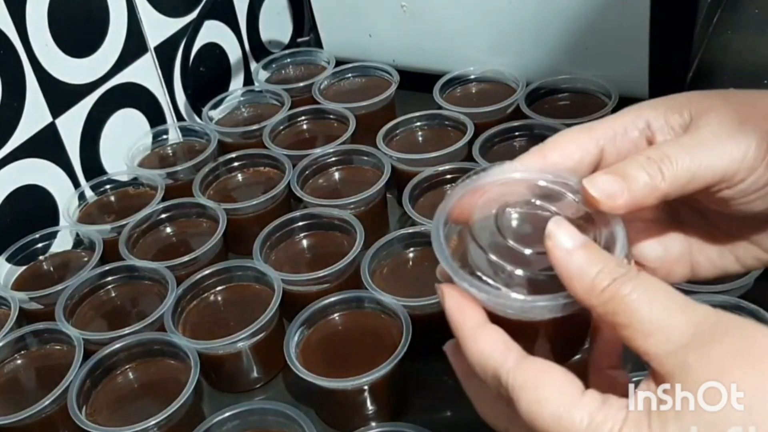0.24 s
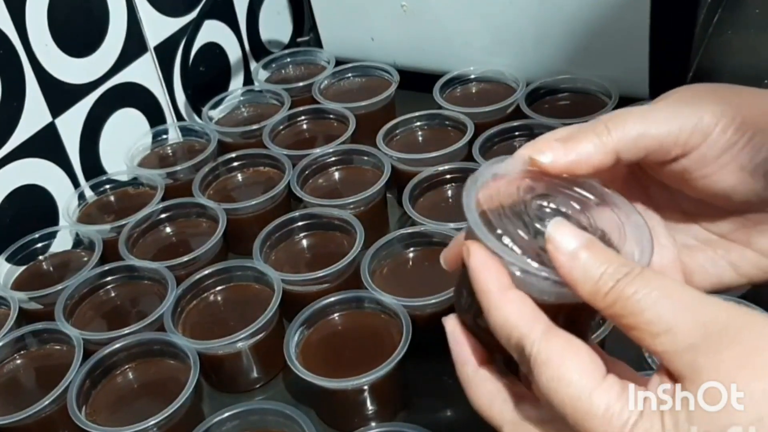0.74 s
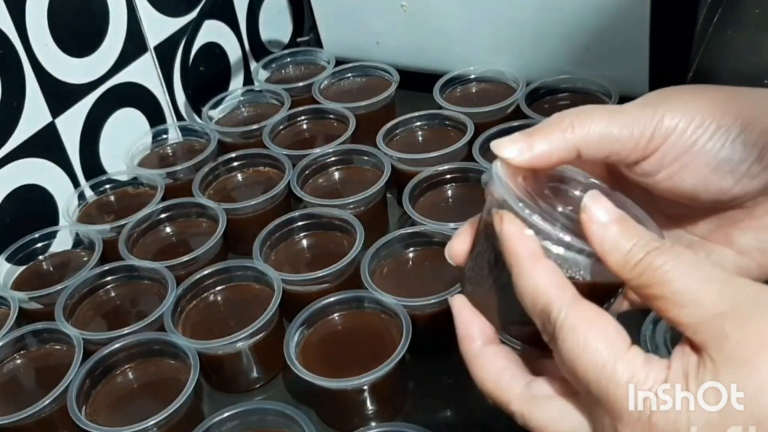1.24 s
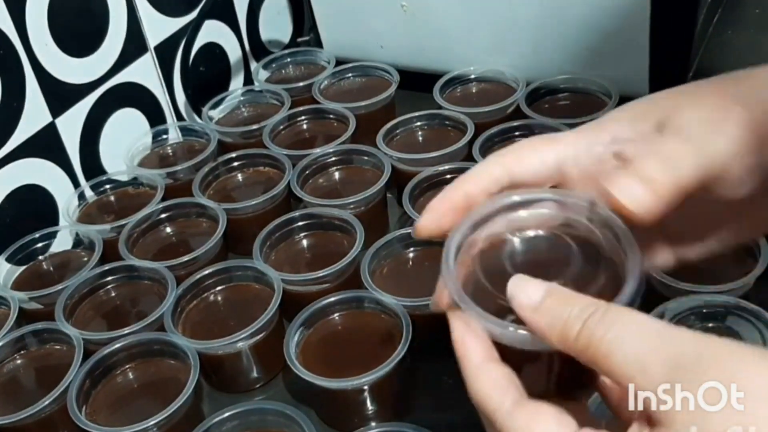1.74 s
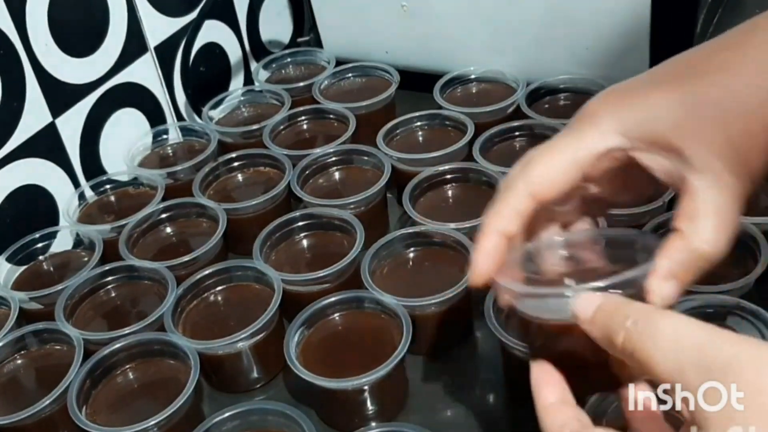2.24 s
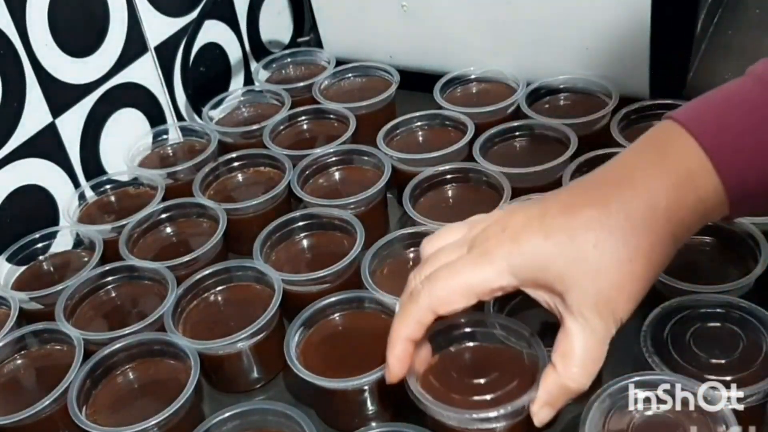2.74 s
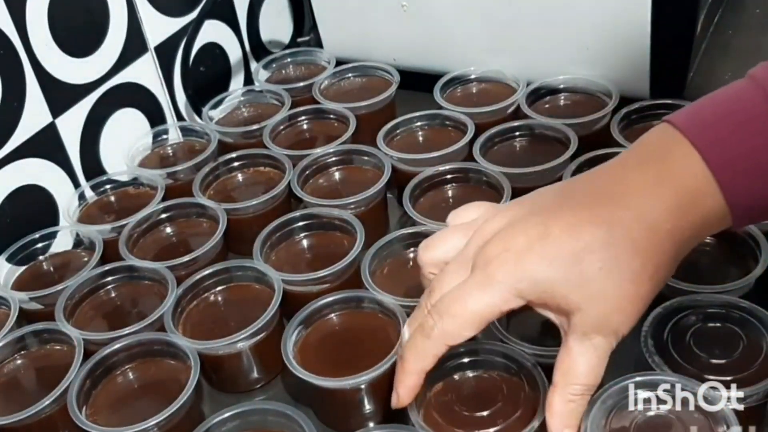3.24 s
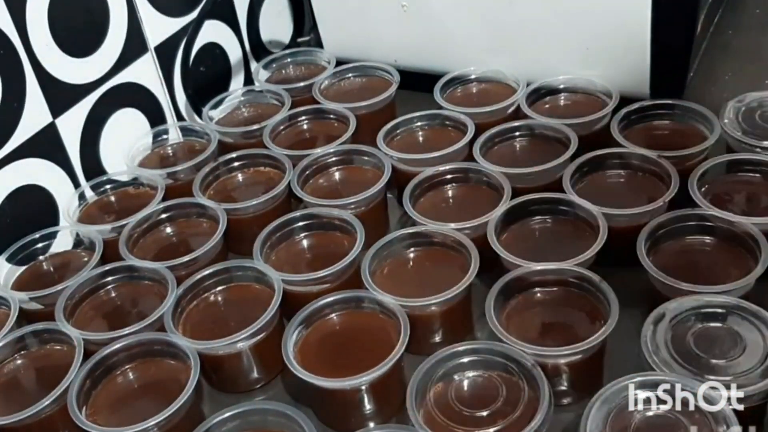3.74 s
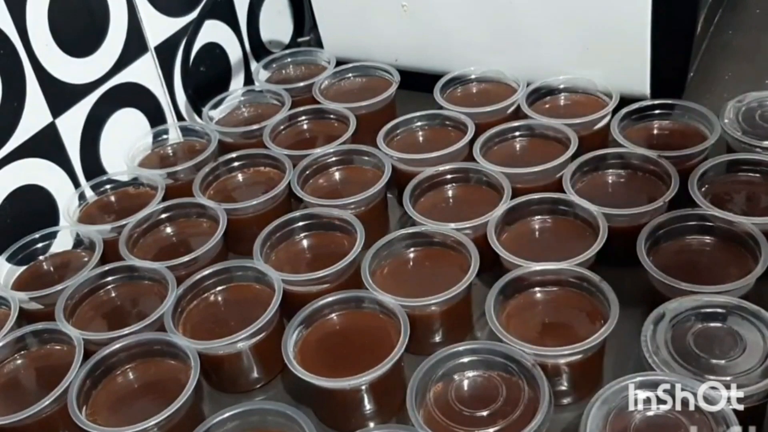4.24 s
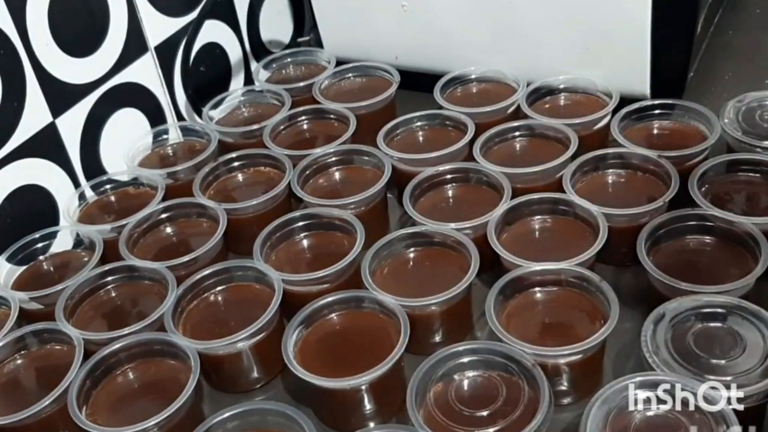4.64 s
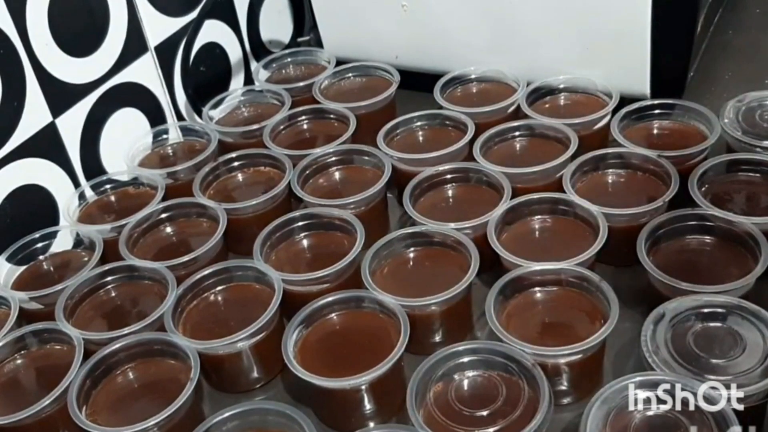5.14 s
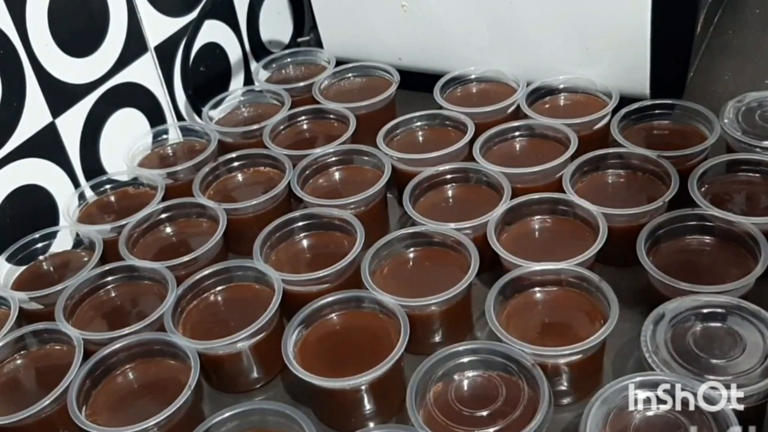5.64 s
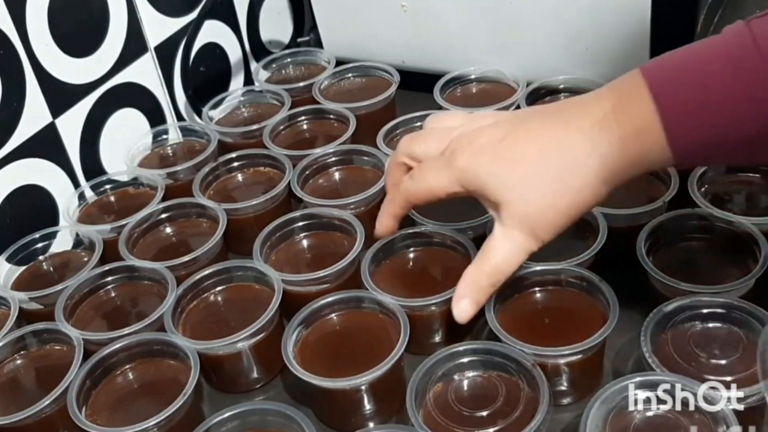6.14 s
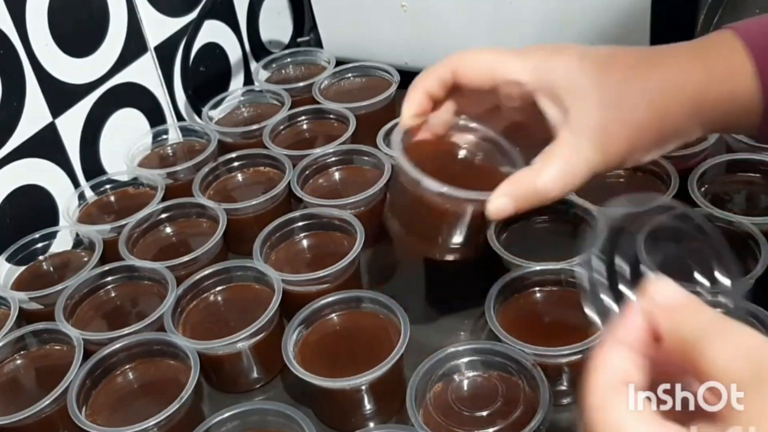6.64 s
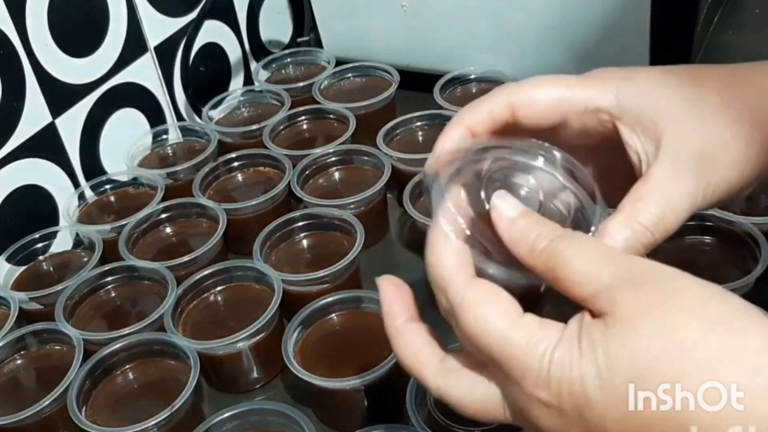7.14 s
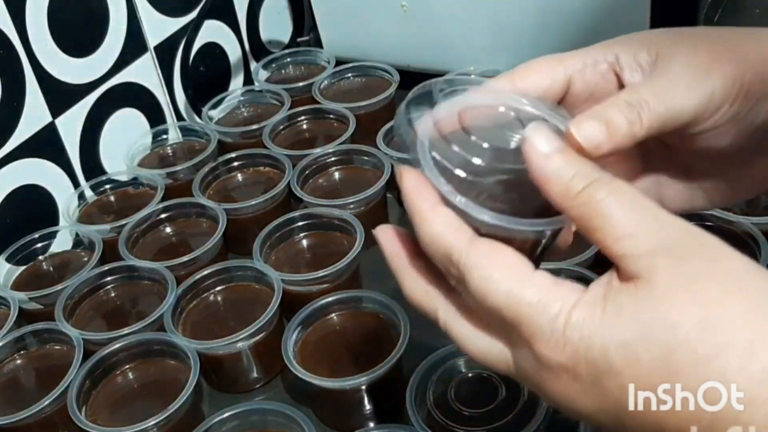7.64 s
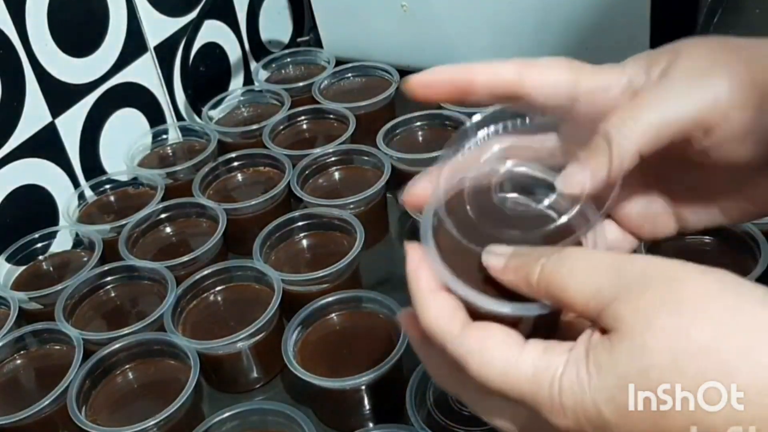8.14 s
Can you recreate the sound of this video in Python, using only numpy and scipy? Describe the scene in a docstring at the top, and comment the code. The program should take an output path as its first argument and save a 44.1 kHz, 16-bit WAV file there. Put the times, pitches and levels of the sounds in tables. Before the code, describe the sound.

Hands press light plastic lids onto filled plastic cups. Crisp, bright snaps arrive irregularly, each leaving a brief crackle and a short room echo. Between them come thin rustles, wall creaks, edge ticks, gritty scrapes and tiny faint squeaks. The strongest run of snaps, with dull table thuds, comes past the middle, then busy crinkling continues to the end. Close two-channel pickup, quiet hissy room.

```python
"""A sharp plastic snap comes almost at once, then others, as thin lids are pressed onto plastic cups.
Each snap is a noise burst of tiny buckles ringing modes of cup and lid; crackle dies away after it.
Between snaps, shaped noise and slips make rustle, creaks, ticks and scrapes; cups knock on the table.
Faint wavering tones come and go over room hiss and low rumble.
A close two-port microphone hears it all in a small hard room, with sparse decaying echoes of the hits."""
import sys
import numpy as np
from scipy import signal
from scipy.io import wavfile
from scipy.ndimage import uniform_filter1d

SR = 44100
rng = np.random.default_rng(int(sys.argv[2]) if len(sys.argv) > 2 else 0)


def log_audio(samples):
    """Write samples as a 16-bit WAV file to the path given in sys.argv[1]."""
    # one column per channel
    frames = np.atleast_2d(samples).T
    # limit to full scale, then quantise
    limited = np.clip(frames, -1, 1)
    pcm = np.round(limited * 32767).astype(np.int16)
    wavfile.write(sys.argv[1], SR, pcm)


N = 369558  # samples


def gain_of(db):
    """Amplitude factor of a level in dB."""
    return 10 ** (np.asarray(db) / 20)


def evened(x):
    """Scale to rms 1."""
    return x / np.sqrt(np.mean(x ** 2) + 1e-20)


def peaked(x):
    """Scale to peak 1."""
    return x / (np.max(abs(x)) + 1e-12)


def read(points, hz):
    """Interpolate a (frequency, value) table along log frequency."""
    f, value = np.transpose(points)
    return np.interp(np.log(hz + 1), np.log(f + 1), value)


def add(mix, time_s, sound):
    """Mix a two-port sound in at its time, cut at the end."""
    part = mix[:, round(time_s * SR):][:, :sound.shape[1]]
    part += sound[:, :part.shape[1]]


def ring(x, modes):
    """Each mode: shift its pitch curve to zero, smooth twice, shift back; neighbours swing in opposition."""
    out = 0
    for k, (hz, width_hz, db) in enumerate(modes):
        phase = 2 * np.pi * np.cumsum(hz * np.ones(x.shape[-1])) / SR
        turn = np.exp(1j * phase)
        r = np.exp(-np.pi * width_hz / SR)  # width of each of the two poles
        shifted = x * turn.conj() + 1e-18
        smooth = signal.lfilter([(1 - r) ** 2], [1, -2 * r, r * r], shifted)
        out = out + (-1) ** k * gain_of(db) * 2 * (turn * smooth).real
    return out


def slips(per_s, spread_db, fade_s):
    """Sparse slips of the skin on plastic, most small and a few large, each starting sharply and fading."""
    when, size = rng.random(N), rng.exponential(1, N)
    starts = (when < per_s / SR) * gain_of(spread_db * np.minimum(size, 3))
    return evened(signal.lfilter([1], [1, -np.exp(-1 / (fade_s * SR))], starts))


def drift(per_s):
    """Slow random curve: straight lines between normal draws."""
    steps = rng.standard_normal(round(N / SR * per_s) + 2)
    return np.interp(np.arange(N) / SR * per_s, np.arange(len(steps)), steps)


def thin(x):
    """Light plastic radiates no bass: high-pass at 350 Hz."""
    return signal.lfilter(*signal.butter(2, 350.0, "high", fs=SR), x)


# Likeness of the two ports' noise: (frequency [Hz], correlation)
PORT_LIKENESS = [(60, 0.76), (300, 0.99), (700, 0.1), (2000, 0.051), (6000, 0.54)]
# Port balance of the noise: (frequency [Hz], left-right difference [dB])
PORT_LEAN = [(60, 5), (300, -4.5), (1000, 2.5), (4000, 0.5), (15000, 2)]


def noise(spectrum, patchy_db, size=512):
    """Random short-time spectra for both ports, with drifting patches, fainter in the bass."""
    frames, hz = 4 * N // size + 5, np.fft.rfftfreq(size, 1 / SR)
    a, b, c, d, patches = rng.standard_normal((frames, len(hz), 5)).T
    patches = evened(uniform_filter1d(uniform_filter1d(patches, 18, 0), 12, 1))
    same = read(PORT_LIKENESS, hz)[:, None]
    left = a + 1j * b
    right = same * left + np.sqrt(1 - same ** 2) * (c + 1j * d)
    patch_share = (hz / (hz + 900))[:, None]
    z = np.array([left, right])
    z *= gain_of(read(spectrum, hz)[:, None] + patchy_db * patches * patch_share)
    z *= gain_of(np.array([.5, -.5])[:, None] * read(PORT_LEAN, hz))[:, :, None]
    return evened(signal.istft(z, nperseg=size, noverlap=3 * size // 4)[1][:, :N])


AIR_DB = -58  # rms of the hiss
# Room hiss spectrum: (frequency [Hz], relative level per Hz [dB])
AIR_SPECTRUM = [(90, -28), (160, -3.5), (500, -5), (1000, -10), (2000, 2), (5000, -9.5), (8700, -18.5),
                (12000, -11), (16000, -4)]
# Table rumble spectrum: (frequency [Hz], relative level per Hz [dB])
TABLE_SPECTRUM = [(20, -21), (70, 6), (130, 0), (400, -2), (800, -92)]
# Low rumble through the table: (time [s], level [dB])
RUMBLE = [(0.0, -72.5), (5.179, -78), (5.46, -58), (5.55, -73.5), (7.7, -70), (7.9, -60), (8.05, -74),
          (8.38, -68)]


def background():
    """Shaped noise: room hiss, and a low rumble that swells when the table is stirred."""
    rumble_db = np.interp(np.arange(N) / SR, *np.transpose(RUMBLE))
    hiss = gain_of(AIR_DB) * noise(AIR_SPECTRUM, patchy_db=7.0)
    return hiss + gain_of(rumble_db) * noise(TABLE_SPECTRUM, patchy_db=12.0, size=4096)


# Faint drawn-out tones: (time [s], length [s], pitch [Hz], rms before the fades [dB])
SQUEAKS = [(0.12, 0.42, 455, -67), (1.563, 0.065, 895, -54), (3.022, 0.059, 788, -57.5),
           (3.101, 0.55, 515, -64.5), (3.2, 0.076, 856, -55.5), (3.445, 0.044, 850, -61),
           (5.031, 0.12, 1081, -53.5), (5.649, 0.035, 838, -48), (5.755, 0.025, 1023, -53),
           (6.965, 0.15, 968, -59), (7.118, 0.53, 190.7, -66.5), (8.078, 0.055, 1476, -52)]


def squeaks():
    """Fuzzy tones: a wavering whistle, clearest in short ones, plus noise in its resonance and a little rub."""
    out = np.zeros((2, N))
    chance = rng.standard_normal((len(SQUEAKS), 3, SR))
    for (time_s, length_s, hz, db), (shared, *own) in zip(SQUEAKS, chance):
        n = round(length_s * SR)
        pitch_hz = hz * (1 + .007 * evened(uniform_filter1d(shared, 3000)))
        modes = [(pitch_hz, 0.061 * hz, 0), (1.34 * hz, hz, -24)]
        fuzz = evened(ring(shared + 0.87 * np.array(own), modes)[:, -n:])
        whistle = np.cos(2 * np.pi * np.cumsum(pitch_hz[-n:]) / SR)
        tone = evened(fuzz + min(0.11 / length_s, 1.3) * whistle)
        add(out, time_s, gain_of(db) * tone * signal.windows.tukey(n, .3) * np.linspace(1.2, .7, n))
    return out


# Peak after each snap, relative to its rim (crackle), flex or pop
SETTLE_RIM_DB, SETTLE_FLEX_DB, SETTLE_CREAK_DB = -55, -23.5, -25.5
SETTLE_S = 0.044  # decay time constant


def settling(levels_db):
    """Exponentially dying level of the crackle that each snap leaves behind."""
    kicks = np.zeros(N)
    kicks[[round(row[0] * SR) for row in SNAPS]] = gain_of(levels_db)
    return signal.lfilter([1], [1, -np.exp(-1 / (SETTLE_S * SR))], kicks)


FLEX_DB = -3.5  # the flexing lid, relative to the rustle
# How busy the hands are: (time [s], lid rustle level [dB], cup wall creak level [dB])
HANDLING = [(0, -54, -54), (.3, -64.5, -59.5), (0.551, -55, -52.5), (.69, -60.5, -61.5),
            (.88, -55.5, -50.5), (1.2, -52.5, -57.5), (1.77, -62, -79), (1.92, -53.5, -53),
            (2.15, -62.5, -61), (2.75, -61, -56.5), (3.2, -54, -60), (3.8, -58.5, -61), (4.3, -58, -56),
            (4.85, -59.5, -61.5), (5.27, -67, -62.5), (5.7, -57, -54), (6.36, -62, -60), (6.64, -68.5, -61),
            (6.8, -52.5, -56.5), (7.06, -64.5, -63.5), (7.2, -44.5, -52.5), (7.72, -62, -53.5),
            (7.86, -48.5, -52), (8.0, -64.5, -57.5), (8.12, -54, -54.5), (8.38, -50, -51.5)]
# Lid rustle spectrum: (frequency [Hz], relative level per Hz [dB])
RUSTLE_SPECTRUM = [(2590, -40), (4400, -7.5), (7550, -7.5), (8100, -9), (8640, -20), (11100, -9.5),
                   (15000, -24.5), (16000, -31)]
# Cup wall modes: (frequency [Hz], width [Hz], relative level [dB])
WALL_MODES = [(578, 300, -1.5), (848, 220, -3), (1087, 630, 5.5), (1450, 190, 5.5), (2103, 330, 3),
              (2420, 690, -6)]


def handling():
    """Fingers make the cup walls creak in small slips and the lid rustle in fine crackle."""
    time_s, *columns = np.transpose(HANDLING)
    rustle, strain = (gain_of(np.interp(np.arange(N) / SR, time_s, c)) for c in columns)
    _, rim_db, _, pop_db, flex_db, *_ = np.transpose(SNAPS)
    shared, left, right = rng.standard_normal((N, 3)).T
    rub = shared + 2.5 * np.array([left, right])
    crackle = 1 + .4 * slips(200, 3, .003) + .45 * slips(22, 3, .002)

    rim_level = np.hypot(rustle, settling(rim_db + SETTLE_RIM_DB))
    rim = rim_level * evened(noise(RUSTLE_SPECTRUM, patchy_db=4.5) * crackle)
    flex_level = np.hypot(gain_of(FLEX_DB) * rustle, settling(rim_db + flex_db + SETTLE_FLEX_DB))
    flex = flex_level * evened(ring(rub * crackle, FLEX_MODES))

    # each slip catches one part of the wall, so every mode creaks at its own moments
    creak = 0
    for hz, width_hz, db in WALL_MODES:
        push = rub * (1.0 + slips(18, 2.5, .012)) * gain_of(4 * drift(9))
        bent_hz = hz * (1 + .08 * drift(6))  # the grip bends the pitch
        creak = creak + ring(push, [(bent_hz, width_hz, db)])
    settle = settling(rim_db + pop_db + SETTLE_CREAK_DB) * evened(ring(rub, [(966.0, 1760.0, 0)]))
    return rim + flex + strain * evened(creak) + settle


SCRAPE_RISE_S = .004
# A lid edge drags over a cup:
# (time [s], decay time [s], pitch [Hz], width [Hz], rms before envelope and grit [dB])
SCRAPES = [(0.068, 0.1, 5760, 2490, -43.5), (1.424, 0.069, 1340, 1100, -47),
           (1.666, 0.11, 1456, 150, -52.5), (2.128, 0.097, 1720, 1800, -51),
           (2.215, 0.11, 4480, 1040, -42.5), (2.72, 0.11, 2850, 2520, -52.5),
           (3.299, 0.13, 5200, 4030, -38), (4.516, 0.11, 6700, 2000, -51), (4.899, 0.13, 1750, 730, -48),
           (4.978, 0.11, 5300, 2700, -47), (5.457, 0.046, 5260, 4040, -34.5),
           (5.67, 0.064, 6040, 8260, -46), (5.672, 0.041, 1280, 1500, -45),
           (5.889, 0.084, 3580, 900, -47.5), (5.992, 0.081, 4300, 1200, -47),
           (6.111, 0.11, 4720, 1520, -49), (6.485, 0.074, 3950, 890, -53), (6.729, 0.058, 4050, 800, -45.5),
           (7.104, 0.049, 6440, 2020, -48), (7.117, 0.064, 2080, 2020, -46.5),
           (7.212, 0.061, 7330, 2530, -39.5), (7.827, 0.046, 1700, 1500, -48),
           (8.148, 0.049, 1460, 585, -42.5), (8.284, 0.09, 3970, 600, -46)]


def scrapes():
    """Gritty noise in one resonance: an abrupt start, then it thins out."""
    out, t = np.zeros((2, N)), np.arange(SR // 3) / SR
    chance = rng.standard_normal((len(SCRAPES), 3, len(t)))
    grit = 1 + .55 * slips(120, 3.5, .003)
    for (time_s, decay_s, hz, width_hz, db), (shared, *own) in zip(SCRAPES, chance):
        hiss = ring(shared + 2.1 * np.array(own), [(hz, width_hz, 0)])
        hiss = ring(hiss, [(hz, 2 * width_hz, 0)])
        envelope = np.minimum(t / SCRAPE_RISE_S, 1) * np.exp(-(t / decay_s) ** 1.93)
        add(out, time_s, gain_of(db) * evened(hiss) * envelope)
    return out * evened(grit)


def flicks(rows, width_share, burst_s, after_db, after_s):
    """A thin click and a short burst of noise in one band, then a fainter fading crackle in a broader band."""
    out, t = np.zeros((2, N)), np.arange(7000) / SR
    chance = rng.standard_normal((len(rows), 3, len(t)))
    rise = np.minimum(t / 0.00078, 1)
    burst = rise * np.exp(-t / burst_s)
    after = rise * gain_of(after_db) * np.exp(-t / after_s)
    for (time_s, db, hz), (shared, *own) in zip(rows, chance):
        push = shared + 1.1 * np.array(own)
        click = gain_of(-13.5) * np.diff(push * np.exp(-t / 0.0013), prepend=0) * np.sqrt(hz / SR)
        sound = ring(push * burst, [(hz, width_share * hz, 0)])
        sound = sound + ring(push * after, [(hz, 1.7 * width_share * hz, 0)]) + click
        add(out, time_s, gain_of(db) * peaked(sound) * gain_of([[1.2], [-1.2]]))
    return out


# Small ticks of the lid's edge: (time [s], peak before port balance [dB], pitch [Hz])
TICKS = [(0.395, -39.5, 4500), (0.476, -40, 6800), (0.545, -38, 7400), (0.5996, -39, 4500),
         (0.721, -38, 6200), (0.8994, -40.5, 5150), (1.8614, -38, 4860), (1.891, -35.5, 3600),
         (2.22, -42, 4230), (2.4147, -37.5, 7100), (2.522, -34, 4600), (2.5827, -40, 3960),
         (2.9347, -36, 4300), (3.2953, -28.5, 3430), (3.3864, -31.5, 4750), (3.588, -31, 5400),
         (4.1073, -33.5, 6680), (4.1884, -36.5, 5160), (4.732, -39, 4500), (5.0826, -33, 5310),
         (5.478, -40, 5800), (5.521, -43, 6000), (5.8845, -29, 3930), (6.0605, -38, 5030),
         (6.502, -30.5, 4300), (6.741, -33.5, 4140), (6.762, -29, 5370), (6.9227, -36, 4900),
         (7.2133, -32, 7640), (7.3013, -33.5, 7140), (7.363, -33.5, 4800), (7.4997, -34.5, 3840),
         (7.7498, -39, 5070), (7.8498, -35.5, 3260), (7.8777, -39, 5130), (7.9317, -28.5, 5100),
         (8.253, -31.5, 6230)]


def ticks():
    """The lid's edge flicks: short bursts in a broad high band."""
    return flicks(TICKS, width_share=.45, burst_s=.003, after_db=-19, after_s=.05)


# Single creaks of a cup wall: (time [s], peak before port balance [dB], pitch [Hz])
CREAKS = [(0.177, -35, 2140), (0.348, -41, 1250), (0.413, -36, 2140), (0.523, -38, 1140),
          (0.573, -34, 1250), (0.615, -44, 1000), (0.652, -41, 1010), (0.759, -41.5, 970),
          (0.857, -35.5, 954), (0.98, -34, 1530), (1.423, -31, 2000), (1.941, -38.5, 2150),
          (2.104, -39, 1070), (2.251, -40.5, 1006), (2.477, -41, 1430), (2.522, -36.5, 1380),
          (2.66, -48.5, 1010), (2.727, -36.5, 2040), (3.059, -38.5, 2020), (3.397, -38, 1560),
          (3.512, -39.5, 1990), (3.995, -41.5, 1400), (4.906, -36, 1960), (5.0635, -36, 1230),
          (5.599, -42.5, 1500), (5.781, -41, 1900), (5.924, -42, 1990), (5.945, -37.5, 1880),
          (6.0605, -30, 1990), (6.412, -35, 1030), (6.544, -41, 2170), (6.783, -32.5, 2250),
          (6.869, -33.5, 1300), (7.088, -41, 1040), (7.166, -37, 2020), (7.244, -36, 1660),
          (7.416, -36.5, 2030), (7.83, -46, 1410), (8.153, -34, 1260), (8.231, -35.5, 1720)]


def creaks():
    """A cup wall gives: longer bursts in a narrower, lower band."""
    return flicks(CREAKS, width_share=.2, burst_s=.006, after_db=-14, after_s=.04)


# Cups knocking on the table: (time [s], peak before port balance [dB], pitch [Hz], t60 [s])
KNOCKS = [(1.268, -31.5, 380, 0.066), (5.344, -38.5, 247, 0.089), (5.394, -35, 345, 0.041),
          (5.45, -35.5, 232, 0.13), (5.682, -39.5, 304, 0.055), (5.695, -39.5, 154, 0.062),
          (7.238, -39, 242, 0.04), (7.545, -37.5, 270, 0.026)]


def knocks():
    """A full cup gives a short dull thud when it meets the table: noise in two low modes."""
    out, t = np.zeros((2, N)), np.arange(9000) / SR
    chance = rng.standard_normal((len(KNOCKS), len(t)))
    for (time_s, db, hz, t60_s), push in zip(KNOCKS, chance):
        body = ring(push, [(hz, 160, 0), (2.55 * hz, 450, -4)])
        sound = peaked(body * np.minimum(t / 0.041, 1) * gain_of(-60 * t / t60_s))
        add(out, time_s, gain_of(db + np.array([[-2.5], [2.5]])) * sound)
    return out


def placed(pair, pan_db, lag_per_db=.4):
    """The nearer port hears a sound louder and a little earlier; lags in samples."""
    lag = round(lag_per_db * pan_db)
    near = pair * gain_of([[pan_db / 2], [-pan_db / 2]])
    return np.array([np.roll(near[0], max(-lag, 0)), np.roll(near[1], max(lag, 0))])


# Lid modes, flexing: (frequency [Hz], width [Hz], relative level [dB])
FLEX_MODES = [(2710, 105, 3), (3827, 2050, 7)]
# Lid rim modes: (frequency [Hz], width [Hz], relative level [dB])
RIM_MODES = [(5340, 4900, -1), (5840, 480, 12), (7010, 1330, 6)]
# Highest lid modes, the fizz: (frequency [Hz], width [Hz], relative level [dB])
FIZZ_MODES = [(11000, 360, -3.5), (12900, 5400, -8), (16400, 1200, -19)]
# Snaps: (time [s], rim peak before pan [dB], cup pop pitch [Hz], pop level re rim [dB],
# lid flex level re rim [dB], fizz level re rim [dB], left-right pan [dB], buckling length before x1.4 [s])
SNAPS = [(0.0625, -16, 840, -43, -13.5, -8, 5.5, 0.0055), (0.13, -33.5, 1360, 11.5, 5, 5, 0, 0.0023),
         (1.0547, -34.5, 1350, 6, 0, -7, 0.5, 0.0059), (1.1898, -23.5, 1480, -9.5, -4.5, -13, 0.5, 0.0028),
         (1.2695, -9.5, 1395, 0, -5.5, 0.5, 0.5, 0.0028), (1.275, -31.5, 1250, 18.5, -17, 5, -1.5, 0.0017),
         (1.5207, -26.5, 2100, -45, -25, -18, 10, 0.0058), (1.542, -31.5, 1964, 7, 7, -19, 1.5, 0.0034),
         (2.45, -44, 1530, -42, 9, 1, 6.5, 0.0062), (3.0781, -11.5, 1990, -22.5, -30, -9.5, 1.5, 0.004),
         (3.276, -32, 2080, -36, -3, -7, 3, 0.0088), (4.153, -36.5, 920, -7, -1.5, 0, 0.5, 0.0046),
         (4.4768, -31, 2250, -17, -6, 2.5, -2, 0.0035), (4.544, -30, 2520, -18, -5.5, 2, 0.5, 0.0039),
         (5.339, -28.5, 740, -9.5, 4, 2, -3.5, 0.0033), (5.3948, -20.5, 1430, -28, 2.5, -6, -6, 0.0055),
         (5.3983, -15.5, 1530, -16.5, -12, -9, 1, 0.0036), (5.456, -7.5, 2510, -18, -7, -6.5, -3.5, 0.0028),
         (5.4972, -17, 2400, -16, -5, -12, 0, 0.0047), (7.1237, -26, 1850, -15, -17, -13, -1, 0.01),
         (7.1644, -37, 2020, 2.5, -2, 1, -1, 0.018), (7.4632, -33, 1990, 1, 4, 2.5, 1, 0.0039),
         (7.5485, -28, 2050, 3.5, 6, -4, 1, 0.0053), (7.599, -33, 2130, 4, 9.5, -0.5, -1, 0.0047),
         (8.0275, -27, 2200, -14, -8, -25, 3.5, 0.0026), ]


def snaps():
    """A sharp first buckle and a dying shower of smaller ones drive cup and lid."""
    out, t = np.zeros((2, N)), np.arange(1800) / SR
    chance = rng.standard_normal((len(SNAPS), 4, len(t)))
    for row, (shared, size, *own) in zip(SNAPS, chance):
        time_s, rim_db, hz, pop_db, flex_db, fizz_db, pan_db, length_s = row
        shower = np.exp(-(t / (1.4 * length_s)) ** 1.25)
        first = 0.8 * np.exp(-t / 0.0006)
        shape = np.minimum(t / 0.000077, 1) * (shower + first)
        buckles = (shared + 0.28 * np.array(own)) * gain_of(6.64 * size) * shape
        pop_modes = [(0.745 * hz, 300, -6), (hz, 260, 0), (1.56 * hz, 700, -16)]
        cup = gain_of(pop_db) * peaked(ring(buckles, pop_modes))
        flex = gain_of(flex_db) * peaked(ring(buckles, FLEX_MODES))
        rim = peaked(ring(buckles, RIM_MODES))
        fizz = gain_of(fizz_db) * peaked(ring(buckles, FIZZ_MODES))
        add(out, time_s, placed(gain_of(rim_db) * (cup + flex + rim + fizz), pan_db))
    return out


# Echo decay: (frequency [Hz], t60 [s])
ROOM_DECAY = [(250, 0.93), (660, 0.49), (1740, 0.46), (4590, 0.23), (12100, 0.3)]


def tail():
    """Sparse taps of random sign, one in every 20 samples, building up, each band dying at its own speed."""
    taps = np.zeros((2, SR // 2))
    at = np.arange(260, SR // 2 - 20, 20) + rng.integers(0, 20, (2, (SR // 2 - 261) // 20))
    np.put_along_axis(taps, at, rng.choice([-1., 1.], at.shape), 1)
    hz, t, z = signal.stft(taps, SR, nperseg=256)
    decay = gain_of(-60 * t / read(ROOM_DECAY, hz)[:, None])
    echo = signal.istft(z * np.minimum(t / 0.017, 1) * decay, SR, nperseg=256)[1]
    return echo / np.linalg.norm(echo[0])


def room(x):
    """The echoes are passed around three random patterns, 40 rounds a second, for an even, dense tail."""
    turn = 2 * np.pi * 40 * np.arange(N) / SR
    shares = [np.sqrt(2 / 3) * abs(np.cos(turn / 2 + k * np.pi / 3)) for k in range(3)]
    return sum(signal.fftconvolve(x * share, tail(), axes=1)[:, :N] for share in shares)


HANDS_LAG_SAMPLES = 7  # the rubbing of the hands reaches the left port late


def scene():
    """Rubbing and hits at the ports, echoes of the hits, and the background."""
    edge_hits = ticks() + creaks()
    left, right = thin(handling() + scrapes()) + squeaks()
    rubbing = np.array([np.roll(left, HANDS_LAG_SAMPLES), right])
    hits = thin(snaps() + edge_hits) + knocks()
    bright_hits = signal.lfilter(*signal.butter(1, 2500.0, "high", fs=SR), hits)
    return hits + rubbing + gain_of(-8.0) * room(bright_hits) + background()


EDGE_HZ = 16000


def record(dry):
    """The band limit of the recorder: a linear-phase low-pass."""
    lowpass = signal.firwin(511, EDGE_HZ, window=("kaiser", 9), fs=SR)
    return signal.oaconvolve(dry, lowpass[None], "same")


dry = scene()
out = record(dry)
log_audio(out)
```